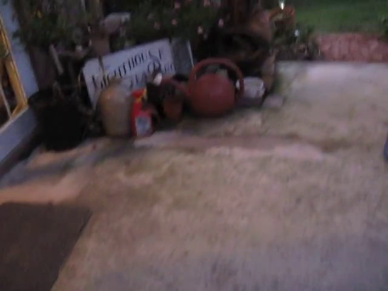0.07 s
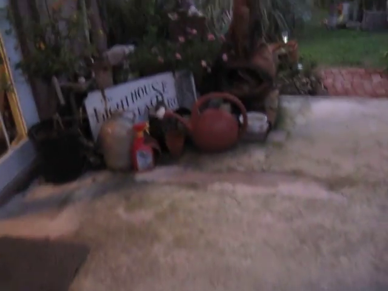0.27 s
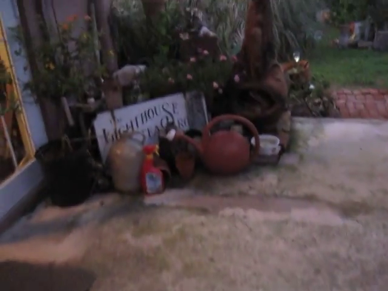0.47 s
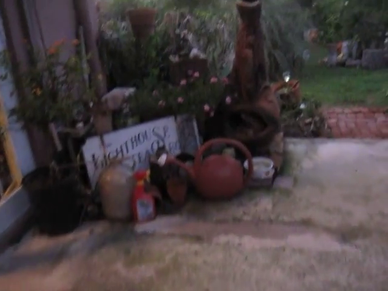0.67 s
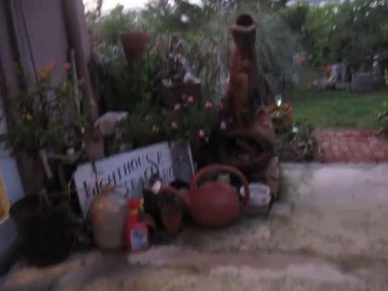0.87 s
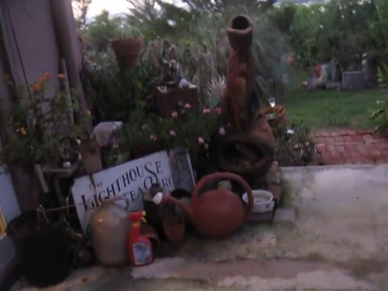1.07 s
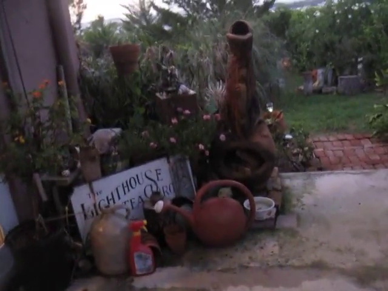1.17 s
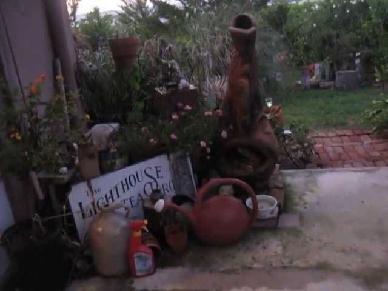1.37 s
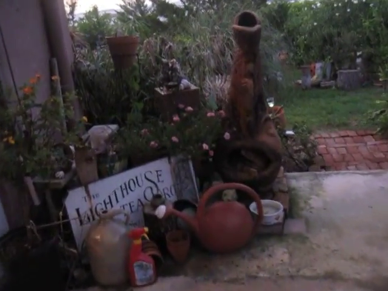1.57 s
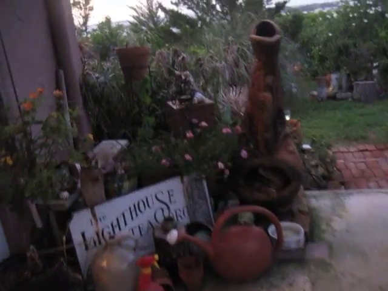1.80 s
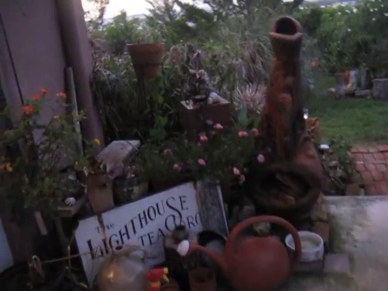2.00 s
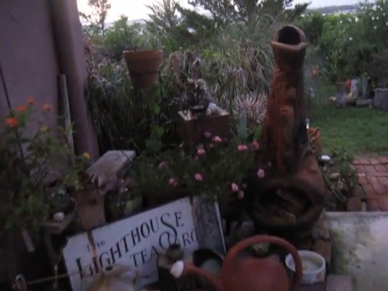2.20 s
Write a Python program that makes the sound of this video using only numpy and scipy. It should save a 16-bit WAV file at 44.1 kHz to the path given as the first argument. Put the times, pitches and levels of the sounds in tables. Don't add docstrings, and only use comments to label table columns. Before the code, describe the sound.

Tree frogs whistle in short, clear high peeps throughout, mixed with lower notes and upward scoops, over a blurred distant chorus. Crickets trill above a soft air hush and faint hum. Sharp clicks land at 0.2 and 0.3 seconds, and strong peeps around 0.5. Soft wind thuds come near 1.1, clicks and a dull knock around 1.3, then louder whistles and gritty shoe scuffs at 1.65 and 2.05.

```python
import sys
import numpy as np
from scipy import signal
from scipy.fft import rfft, irfft
from scipy.io import wavfile
from scipy.ndimage import uniform_filter1d

SR = 44100
rng = np.random.default_rng(int(sys.argv[2]) if len(sys.argv) > 2 else 0)


def voltage_ratio(level):
    return 10 ** (np.asarray(level, float) / 20)


def pcm_store(signal):
    levels = np.round(np.clip(np.atleast_2d(signal), -1, 1) * 32767)
    wavfile.write(sys.argv[1], SR, levels.astype(np.int16).T)


N = 99092

# pitch in Hz, level in dB per Hz.
AIR_COLOUR = [(110, -4.5), (220, -8), (1000, -7), (1550, -10.5), (3000, -9), (8700, -23), (11900, -25),
              (14500, -38)]
AIR_DB = -46.5
# pitch in Hz, level in dB.
HUMS = [(119.8, -58.5), (741, -60), (1667, -66)]
# middle in seconds, pitch in Hz, level in dB.
WIND_BUMPS = [(.878, 65, -39), (1.11, 86, -32), (1.15, 170, -33), (1.203, 104, -31.5), (.94, 65, -41.5),
              (1.003, 120, -42), (1.045, 110, -40.5), (1.078, 55, -42), (1.222, 65, -37), (1.255, 70, -43),
              (1.69, 140, -39)]
# middle in seconds, pitch in Hz, level in dB.
KNOCKS = [
    (1.095, 800, -30.5),
    (1.366, 700, -22.5),
    (1.3689, 450, -32),
    (1.368, 300, -36),
]
# start in seconds, length in seconds, centre in Hz, level in dB.
SCUFFS = [(.06, 0.07, 4200, -43), (.075, 0.035, 1870, -36.5), (1.6, 0.038, 4800, -54.5),
          (1.47, 0.015, 6400, -46), (1.656, .035, 2500, -41.5), (1.702, .075, 5560, -49),
          (2.06, 0.055, 7500, -50), (1.665, .04, 800, -50), (2.055, .075, 700, -48),
          (2.105, .03, 1100, -50), (1.15, .03, 9500, -60)]
# start in seconds, centre in Hz, decay in seconds, level in dB.
TICKS = [
    (.879, 14500, .006, -43),
    (1.3, 5380, 0.0079, -24),
    (1.666, 6500, 0.0024, -30),
    (2.056, 4460, 0.012, -30.5),
]
# start in seconds, centre in Hz, level in dB.
CLICKS = [
    (.2158, 4300, -9),
    (.3108, 3500, -14),
    (.891, 13500, -38),
    (1.0955, 9000, -34),
    (1.3006, 6000, -17),
    (1.3028, 8000, -16),
    (1.3075, 5200, -13),
    (1.3088, 5500, -15),
]
# centre in Hz, spread in Hz, call length in seconds, rise in Hz, level in dB.
CHOIRS = [
    (3700, 200, .035, 120, -37),
    (2068, 111.8, .04, 18.5, -44),
    (7430, 280, 0.024, -58, -56),
    (4190, 130, 0.02, 60, -55),
]
# start in seconds, length in seconds, wing pitch in Hz, level in dB.
CHIRPS = [(0.0, 0.035, 7390, -38.5), (0.091, 0.138, 7210, -42), (0.16, 0.104, 7580, -48),
          (0.235, 0.069, 7050, -47), (1.96, 0.104, 7080, -49), (0.271, 0.138, 7558.0, -32),
          (0.269, 0.138, 7340, -33.5), (0.423, 0.138, 7543.0, -44.5), (0.649, 0.138, 7340, -33),
          (0.725, 0.138, 7586, -41.5), (0.743, 0.069, 7630, -48), (0.813, 0.104, 7630, -42.5),
          (1.081, 0.104, 7250, -48), (0.717, 0.104, 7380, -41), (0.99, 0.138, 7550, -44),
          (1.02, 0.104, 7118.0, -40.5), (1.061, 0.138, 7320, -35), (1.382, 0.138, 7560, -30.5),
          (1.374, 0.069, 7200, -45), (1.418, 0.138, 7320, -37.5), (1.576, 0.104, 7540, -40.5),
          (1.537, 0.138, 7230, -45), (1.757, 0.138, 7620, -39), (1.795, 0.138, 7335, -33.5),
          (2.131, 0.104, 7180, -38.5), (2.169, 0.069, 7430, -37), (2.215, 0.035, 7538.0, -30.5)]
PULSE_S, STROKE_S, SLOWING_S = .0305, .019, .0013
WING_SAG_HZ, OCTAVE_DB, RASP_DB = 90, -24, -10
# start in seconds, length in seconds, start pitch in Hz, rise in Hz, peak level in dB.
WHISTLES = [(0.0, 0.028, 3560, 0, -22), (0.045, 0.015, 3500, 0, -28), (0.055, 0.103, 3600, 85, -19),
            (0.165, 0.035, 3670, 10, -27), (0.0, 0.03, 3770, 30, -26), (0.15, 0.11, 3840, 0, -23),
            (0.345, 0.035, 3180, 180, -46), (0.44, 0.035, 4110, 10, -32),
            (0.296, 0.097, 3825, -6.5, -31), (0.27, 0.125, 3710, 56.5, -31),
            (0.505, 0.061, 3880, 39, -16), (0.578, 0.031, 3930, 45, -12),
            (1.2, 0.03, 3820, 46, -27.5), (0.612, 0.01, 3990, 0, -13),
            (0.635, 0.03, 4000, 2.5, -30.5), (0.63, 0.09, 3550, -2.5, -35),
            (0.84, 0.05, 3720, 28.5, -35), (0.806, 0.092, 3755, 22, -22),
            (0.922, 0.093, 3760, 87, -28.5), (1.018, 0.043, 3858, -29, -23),
            (1.0, 0.095, 3650.0, 76, -31.5), (1.062, 0.03, 4000, -10, -35),
            (1.095, 0.02, 4000, 40, -29), (1.088, 0.13, 3825, 0.5, -24), (1.062, 0.02, 3850, 0, -30),
            (1.267, 0.042, 3681, -20, -26),
            (1.2, 0.04, 3640, 17, -23), (1.296, 0.116, 3856, 13.5, -35.5),
                 (1.428, 0.17, 3805, 55, -41), (1.53, 0.045, 4090, 90, -35), (1.572, 0.014, 3560, 150, -28),
                 (1.575, 0.04, 3870, 33, -26.5), (1.62, 0.045, 3895, 36.5, -15),
                 (1.665, 0.02, 3950, 30, -20), (1.694, 0.022, 3985, 49, -15), (1.73, 0.02, 4047, 7, -27),
                 (1.66, 0.115, 3730, 45, -21), (1.4, 0.15, 3490, 68, -37), (1.68, 0.045, 3400, -9, -35),
                 (1.87, 0.015, 3830, -4, -31), (1.893, 0.012, 3830, 3, -23.5),
                 (1.912, 0.045, 3845, 3, -27.5), (1.97, 0.022, 3830, 20, -27.5),
                 (1.999, 0.03, 3865, 29, -25), (2.05, 0.06, 3830, 2, -32.5),
                 (2.215, 0.052, 3577, -4, -32.5), (2.217, 0.038, 3980, -50, -33)]
SWELL_SHARE, FADE_SHARE, EDGE_S = .6, .35, .018
WOBBLE_DB, WAVER_HZ = .98, 10
# start in seconds, length in seconds, pitch in Hz, overtones in dB, peak level in dB.
LOW_NOTES = [(0.0, 0.018, 1990, -18, -30), (0.015, 0.083, 2187, -39.5, -36), (0.084, 0.13, 2120, -39, -38),
             (0.421, 0.066, 1910, -40.5, -31.5), (0.427, 0.048, 2060, -20, -25),
             (0.676, 0.061, 2043, -23, -36), (0.874, 0.057, 1951, -33, -30.5),
             (0.887, 0.046, 2040, -28, -33), (0.926, 0.069, 2130, -22, -39),
             (1.065, 0.042, 1994, -16, -35.5), (1.217, 0.021, 2137, -35, -31),
             (1.545, 0.04, 2152, -35, -37), (2.211, 0.034, 2052, -30, -37.5),
             (1.321, 0.071, 1927, -31, -37.5), (1.357, 0.048, 2070, -33, -36.5),
             (1.525, 0.06, 2045, -14.5, -31), (1.597, 0.037, 2054, -32, -36),
             (1.825, 0.046, 2049, -36, -32.5), (1.956, 0.047, 1954, -23, -31),
             (2.182, 0.056, 2005, -10, -42.5)]
LOW_EDGE_S, DEEP_HZ, DEEP_RISE = .011, 2030, .6
ONSET_HZ, ONSET_S = 45, .012
FLUTTER_HZ, FLUTTER_DB = 50, 3
# start in seconds, length in seconds, final pitch in Hz, peak in dB.
SCOOPS = [
    (.492, 0.12, 3526, -31.5),
    (.925, 0.175, 3525, -22.5),
    (1.116, 0.07, 3710, -21),
    (2.007, 0.195, 3560, -27.5),
]
FLIP_HZ, FLIP_S, CLIMB_HZ, CLIMB_S = 270, .007, 190, .055
SAG_HZ, SAG_S = 70, .025
SWELL_S, RIPPLE_DB, SCOOP_FADE_S = .037, 2, .035
GARDEN_T60_S = .21
FROG_WET_DB, CHOIR_WET_DB = -15, -5


def band(x, hz, q):
    b, a = signal.iirpeak(min(hz, .45 * SR), q, fs=SR)
    once = signal.lfilter(b, a, x)
    return signal.lfilter(b, a, once)


def walk(rate):
    k = int(SR / rate)
    drift = uniform_filter1d(uniform_filter1d(rng.standard_normal(N), k), k)
    return drift / drift.std()


def add(out, start, x):
    i = int(start * SR)
    x = x[max(-i, 0):max(N - i, 0)]
    first = max(i, 0)
    out[first:first + len(x)] += x


def shape(length, attack, release):
    t = np.arange(int((length + (attack + release) / 2) * SR)) / SR
    ramp = np.minimum(t / attack, (t[-1] - t) / release)
    return t, np.sin(np.pi / 2 * np.clip(ramp, 0, 1)) ** 2


def garden(x, wet_db):
    t = np.arange(int(.4 * SR)) / SR
    fade = np.exp(-np.log(1000) * t / GARDEN_T60_S)
    tail = rng.standard_normal(len(t)) * fade * (t > .004)
    echoes = signal.fftconvolve(x, tail / np.linalg.norm(tail))[:N]
    return x + voltage_ratio(wet_db) * echoes


def air():
    f = np.fft.rfftfreq(N, 1 / SR) + 1
    colour_hz, colour_db = np.transpose(AIR_COLOUR)
    colour = voltage_ratio(np.interp(np.log(f), np.log(colour_hz), colour_db))
    hush, swell = 0, walk(7.6)
    for hz in 20 * 2 ** np.arange(0, 10.1, .5):
        part = np.cos(np.pi / 2 * np.clip(2 * np.log2(f / hz), -1, 1))
        noise = irfft(rfft(rng.standard_normal(N)) * colour * part, N)
        hush = hush + voltage_ratio(.5 * swell + .57 * walk(5.5)) * noise
    t = np.arange(N) / SR
    hum = sum(voltage_ratio(db + 4 * walk(7)) * np.sin(2 * np.pi * hz * t) for hz, db in HUMS)
    return voltage_ratio(AIR_DB) * hush / hush.std() + hum


def wind_and_knocks():
    out = np.zeros(N)
    t = np.arange(-1500, 1500) / SR
    for start, hz, db in [*WIND_BUMPS, *KNOCKS]:
        swing = np.sin(2 * np.pi * (hz * t + rng.random()))
        add(out, start + t[0], voltage_ratio(db) * np.exp(-(t * hz / .5) ** 2) * swing)
    return out


def scuffs():
    out = np.zeros(N)
    for start, length, hz, db in SCUFFS:
        t, env = shape(length, .024, .04)
        grains = rng.standard_normal(9000) * voltage_ratio(3 * rng.exponential(size=9000))
        uneven = uniform_filter1d(grains, size=3) * voltage_ratio(3 * walk(90)[:len(grains)])
        sharpness = .61 + 6 * (1500 < hz < 2000)
        grit = band(uneven, hz, sharpness)[:len(t)]
        add(out, start, voltage_ratio(db) * env * grit / grit.std())
    return out


def ticks():
    out = np.zeros(N)
    t = np.arange(2000) / SR
    for start, hz, decay, db in TICKS:
        burst = band(rng.standard_normal(len(t)), hz, 1.34 + 4 * (hz > 12000))
        env = np.exp(-t / decay) * np.clip(t / .0017, 0, 1) / 2
        add(out, start, voltage_ratio(db) * burst / burst.std() * env)
    return out


def clicks():
    out = np.zeros(N)
    impulse = np.zeros(2000)
    impulse[0] = 1
    for start, hz, db in CLICKS:
        add(out, start, voltage_ratio(db) * band(impulse, hz, 1.1))
    return out


def shoes():
    return garden(scuffs() + ticks(), -1) + garden(clicks(), -10.5)


def choirs(count=900):
    out = 0
    for hz, spread, length, rise, db in CHOIRS:
        u, g = rng.random((count, 2)), rng.standard_normal((count, 2))
        t, env = shape(length, length / 2, length / 3)
        steady = (hz + spread * g[:, :1]) * t
        glide = rise * (1 + g[::-1, 1:]) * t * t / length / 2
        phase = 2 * np.pi * (steady + glide + u[:, 1:])
        calls = voltage_ratio(2 * g[:, 1:] - 2 * g[:, :1] ** 2) * env * np.sin(phase)
        where = (u[:, :1] * (N + len(t))).astype(int) + np.arange(len(t))
        crowd = np.bincount(where.ravel(), calls.ravel(), N + 2 * len(t))[len(t):][:N]
        crowd = garden(crowd, CHOIR_WET_DB)
        out = out + voltage_ratio(db + 1.5 * walk(3)) * crowd / crowd.std()
    return out


def crickets():
    out = np.zeros(N)
    t, env = shape(STROKE_S, .006, .009)
    for start, length, hz, db in CHIRPS:
        chance = rng.standard_normal((6, 3))
        rasp = band(rng.standard_normal((6, len(t))), hz - 150, 27)
        octave = voltage_ratio(OCTAVE_DB) * np.exp(-((hz - 7570) / 120) ** 2) * np.exp(-t / .01)
        for k in range(max(round(length / .0345), 1)):
            pitch = hz + 15 * chance[k, 0] - WING_SAG_HZ * (t / STROKE_S - .5)
            phase = 2 * np.pi * np.cumsum(pitch) / SR + 3 * chance[k, 2]
            tone = np.sin(phase) + octave * np.sin(2 * phase)
            stroke = tone + voltage_ratio(RASP_DB) * rasp[k] / rasp.std()
            when = start + k * PULSE_S + k * k * SLOWING_S
            add(out, when, voltage_ratio(db + 1.5 * chance[k, 1]) * env * stroke)
    return garden(out, -6)


def frog_note(out, start, length, hz, rise, db, edge, release, overtone_db=-80, onset_hz=0, flutter_db=0):
    t, env = shape(length, edge, release)
    a, b, c = rng.random(3)
    glide = rise * (t - edge / 2) / length + onset_hz * np.exp(-t / ONSET_S)
    waver = WAVER_HZ * np.sin(2 * np.pi * ((20 + 20 * c) * t + b))
    phase = 2 * np.pi * (np.cumsum(hz + glide + waver) / SR + a)
    wobble = WOBBLE_DB * np.sin(2 * np.pi * ((14 + 20 * b) * t + c))
    flutter = flutter_db * np.sin(2 * np.pi * (FLUTTER_HZ * (1 + b) * t + a))
    overtones = 2 * np.sin(2 * phase) + np.sin(3 * phase)
    voice = np.sin(phase) + voltage_ratio(overtone_db) * overtones
    add(out, start - edge / 2, env * voltage_ratio(db + wobble + flutter) * voice)


def low_notes(out):
    for start, length, hz, overtone_db, db in LOW_NOTES:
        rise = DEEP_RISE * max(DEEP_HZ - hz, 0)
        frog_note(out, start, length, hz, rise, db, LOW_EDGE_S, 2 * LOW_EDGE_S,
                  overtone_db, ONSET_HZ, FLUTTER_DB)


def scoops(out):
    for start, length, hz, db in SCOOPS:
        t, env = shape(length, .0047, SCOOP_FADE_S)
        below = FLIP_HZ * np.exp(-t / FLIP_S) + CLIMB_HZ * np.exp(-t / CLIMB_S)
        droop = SAG_HZ * np.exp((t - t[-1]) / SAG_S)
        phase = 2 * np.pi * np.cumsum(hz - below - droop) / SR
        swell = 1 - .65 * np.exp(-(t / SWELL_S) ** 2)
        ripple = voltage_ratio(RIPPLE_DB * walk(60)[:len(t)])
        add(out, start, voltage_ratio(db) * env * swell * ripple * np.sin(phase))


def whistles(out):
    for start, length, hz, rise, db in WHISTLES:
        fade = max(min(EDGE_S, length), FADE_SHARE * length)
        frog_note(out, start, length, hz, rise, db, SWELL_SHARE * length, fade)


def frogs():
    out = np.zeros(N)
    low_notes(out)
    scoops(out)
    whistles(out)
    return garden(out, FROG_WET_DB)


def scene():
    return (air() + wind_and_knocks() + shoes() + choirs() + crickets() + frogs())[None]


def roll_off(x):
    return signal.sosfilt(signal.butter(12, 15710, fs=SR, output="sos"), x)


def record(dry):
    b, a = signal.butter(1, 30, "high", fs=SR)
    return roll_off(signal.lfilter(b, a, dry))


dry = scene()
out = record(dry)
pcm_store(out)
```